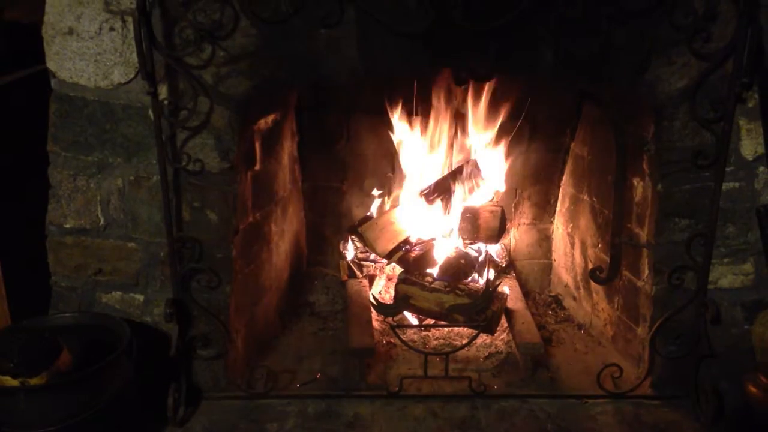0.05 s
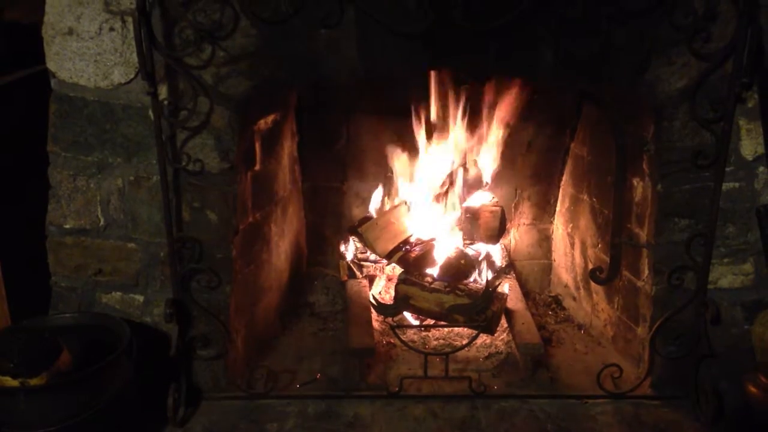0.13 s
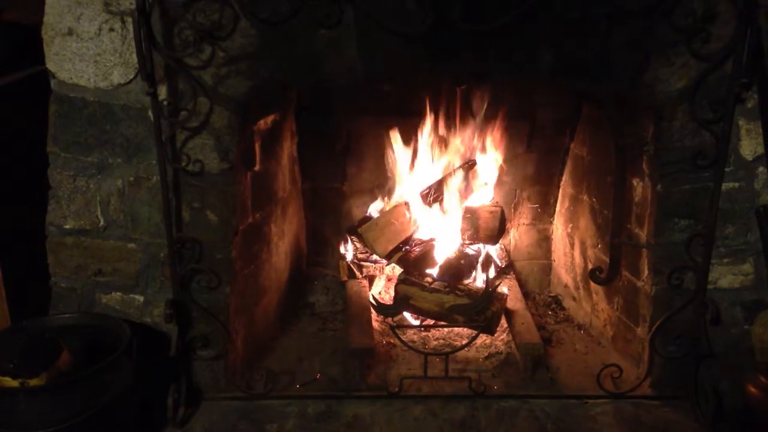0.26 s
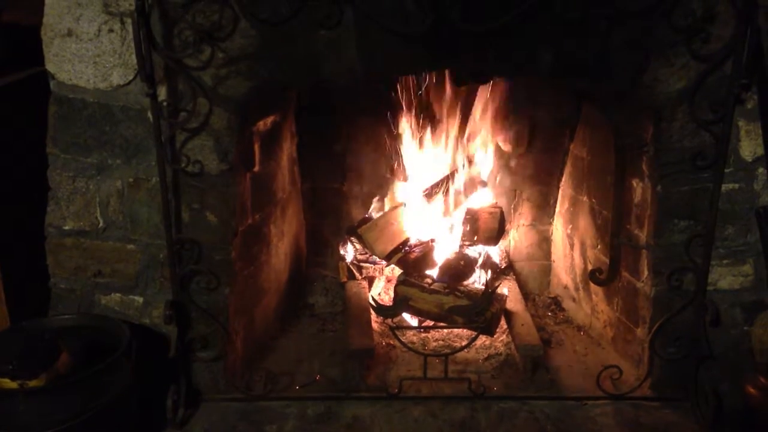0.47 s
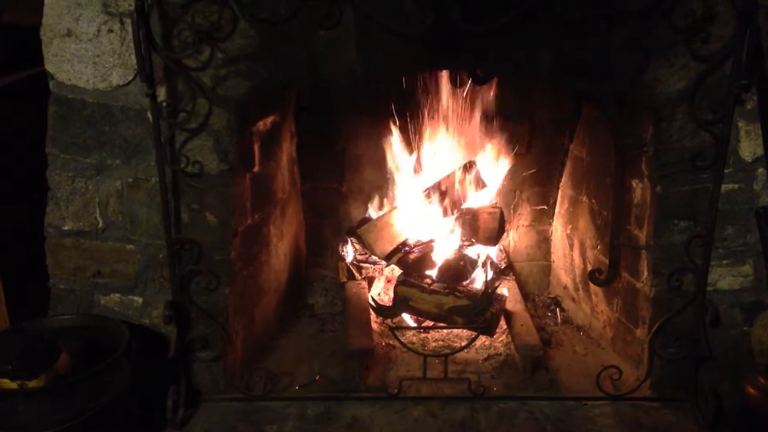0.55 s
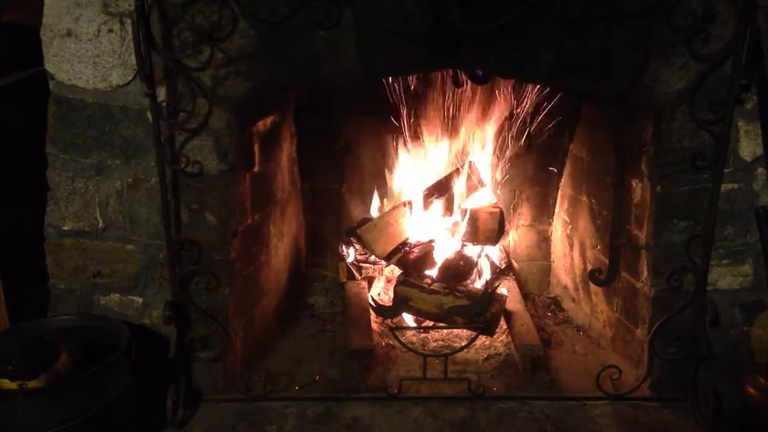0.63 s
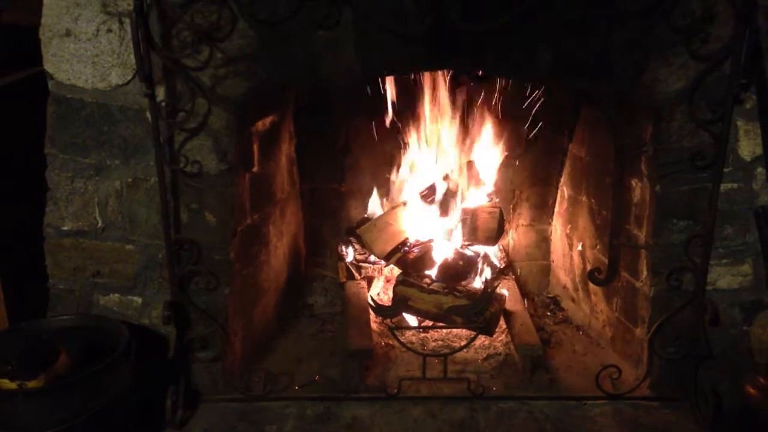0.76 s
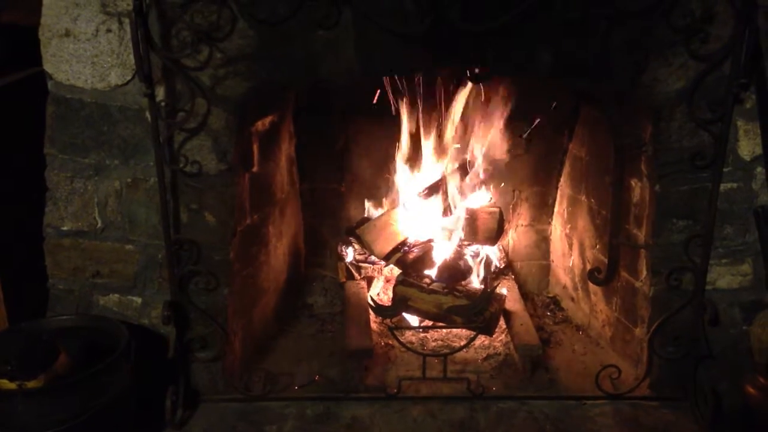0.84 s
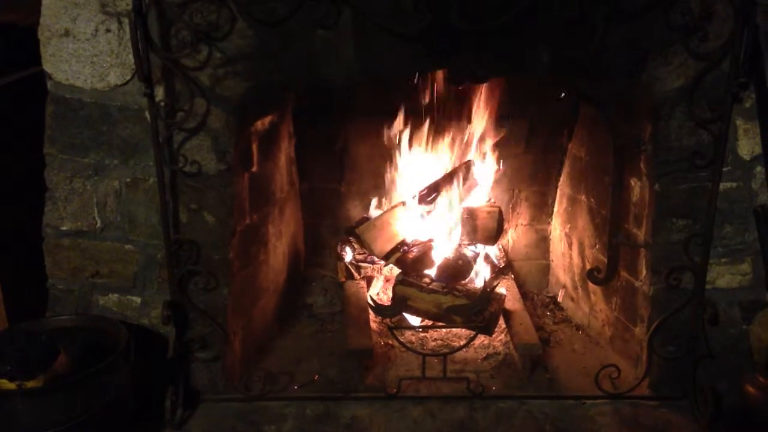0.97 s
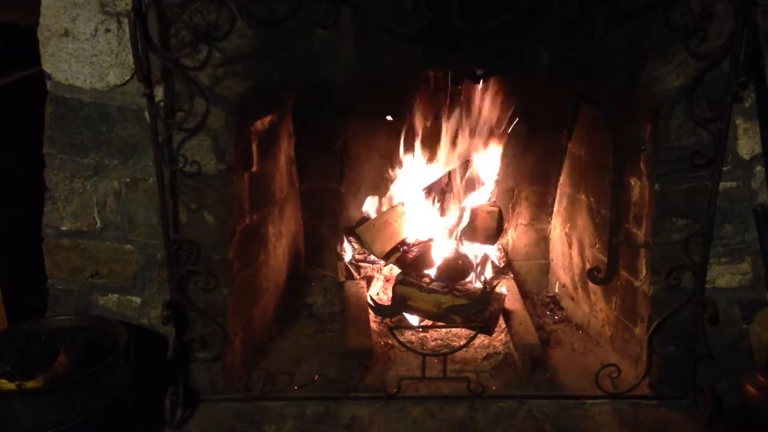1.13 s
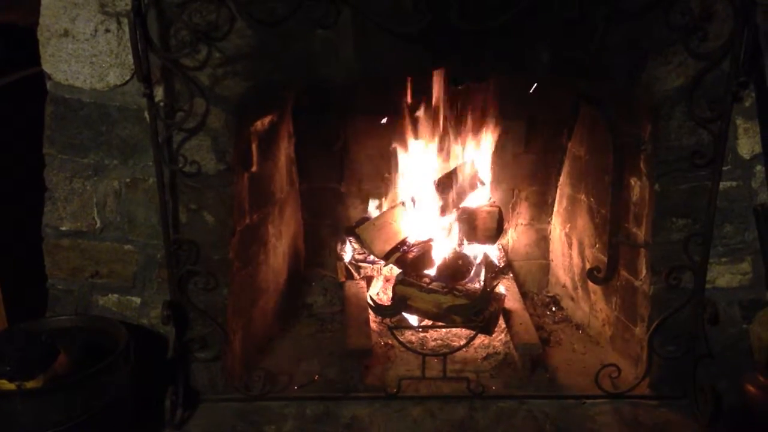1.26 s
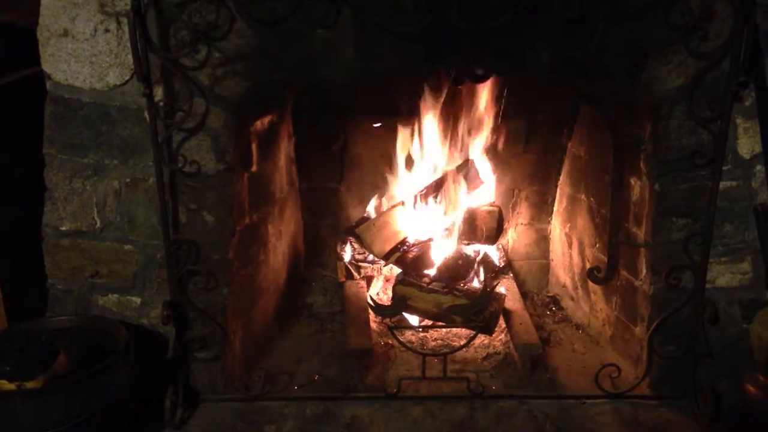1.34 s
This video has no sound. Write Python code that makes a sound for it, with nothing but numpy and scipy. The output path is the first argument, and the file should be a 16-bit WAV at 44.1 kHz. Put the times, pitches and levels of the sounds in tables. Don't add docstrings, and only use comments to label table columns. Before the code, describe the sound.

Wood fire snapping loudly a few times in a hearth, with tiny ticks and very faint low rumble

```python
import sys
import numpy as np
from scipy import signal
from scipy.fft import rfft, irfft, next_fast_len
from scipy.io import wavfile
from scipy.ndimage import uniform_filter1d, map_coordinates

SR = 44100
rng = np.random.default_rng(int(sys.argv[2]) if len(sys.argv) > 2 else 0)


def ratio_of_db(decibels):
    return 10 ** (np.asarray(decibels, float) / 20)


def to_wav(s):
    ch = np.atleast_2d(s).T
    pcm = np.round(np.clip(ch, -1, 1) * 32767)
    wavfile.write(sys.argv[1], SR, pcm.astype(np.int16))


N = 61739

# (time [s], level [dB])
FLAME_STRENGTH = [(0, -0.5), (.06, 1.5), (.16, 3.5), (.3, 1.5), (.4, -3), (.5, -1), (.62, 6), (.7, -3),
                  (.85, -4), (1.1, -1), (1.4, 1)]
# (frequency [Hz], level [dB])
FLAME_TONE = [(15, -45), (30, -19.5), (55, -7.5), (115, 0.5), (190, -3), (300, -15.5), (500, -26.5),
              (900, -39.5)]
# (frequency [Hz], level [dB])
HISS_TONE = [(300, -22.5), (600, -6), (1000, -14.5), (2000, -14.5), (5000, -13), (10000, -15), (15000, -18)]
# (time [s], hiss level [dB])
HISS_GAIN = [(0, 0.5), (.3, 0), (.45, -2.5), (1.199, -3), (1.4, -3)]
# (frequency [Hz], level [dB])
BAND_LIMIT = [(15300, 0), (15500, -24), (16500, -30), (16700, -90)]
# (time [s], peak level [dB], ring [Hz], room level [dB])
SPARKS = [
    (.167, -51, 5500, -5),
    (.1705, -50, 5500, -18),
    (.180, -48.5, 10900, -19),
    (.1915, -45.5, 10500, -21),
    (0.536, -48, 5000, 4.5),
    (.545, -54.5, 9110, -16),
    (0.66, -30, 11300, -30.5),
    (0.8321, -39, 12500, -13),
    (.872, -45, 12250, -17),
    (.853, -56, 4000, -8),
]
# (time [s], peak level [dB], burst [ms], tilt [dB per octave], low body [dB])
POPS = [
    (0.203, -4, 0.55, -1, -3.5),
    (0.2661, -27.5, 0.21, -3.5, 9),
    (0.3589, -6, 1.37, 0, 8),
    (0.5574, -2, 2.4, 0, 7),
    (0.7994, -32.5, .6, -3, -8),
    (0.9578, -21, 0.61, -3.5, 10.5),
    (1.2529, -37.5, 1.1, -2.5, -9.5),
]
# (room [dB], firebox [dB], thump [dB], wall echo [dB])
POP_ANSWERS = [(-17, -6.5, -39, -35), (-14.5, 2.5, -35, -15), (-12.5, -4, -45, -8.5), (-14, -9.5, -23.5, 1),
               (-14.5, -2, -19.5, -5.5), (-12.5, -2.5, -13.5, -9), (-12.5, -2.5, -40, -8)]
# (low ring [Hz], level [dB], high ring [Hz], level [dB])
POCKET_RINGS = [(2000, 4.5, 11000, 13), (3100, 1.5, 9000, 5.5), (2300, 5, 8000, 3), (1323, 8.5, 4400, 8.5),
                (2040, 5.5, 3900, 6.5), (2380, 5.5, 6300, 7.5), (1786, 6.5, 3500, 6.5)]
# (frequency [Hz], level [dB])
WOOD_TONE = [(200, -27.5), (500, -25), (1100, -17.5), (1400, -6.5), (2600, -5), (4600, -2), (9000, -5),
             (14500, -14)]
# (frequency [Hz], level [dB])
HEARTH_GAPS = [(2720, -3.5), (4850, -2.5)]
# (frequency [Hz], time [s])
FIREBOX_DECAY = [(500, 0.051), (3000, 0.061), (10000, 0.041), (15000, 0.044)]
# (frequency [Hz], time [s])
ROOM_DECAY = [(300, 0.27), (1000, 0.26), (1500, .32), (2500, 0.31), (5000, 0.31), (10000, 0.26),
              (15000, 0.21)]
# (frequency [Hz], level [dB])
ROOM_TONE = [(300, 8), (1000, 6), (1500, -5), (2500, -0.5), (5000, -1), (10000, -3.5), (15000, -3.5)]

FLAME_DB, HISS_DB = -61.5, -71
RING_WIDTH, GAP_WIDTH = 0.38, 0.16
RING_HEARD_FAR = 0.55
BODY_HZ = 800
WALL_S = 0.0043
FILL_S = 0.02
THUMP_HZ, THUMP_T60 = 158, 0.024


def unit(x):
    return x / np.sqrt(np.mean(x ** 2) + 1e-20)


def along(points, hz):
    f, v = np.transpose(points)
    return np.interp(np.log(hz + 1), np.log(f + 1), v)


def noise(tone):
    m = next_fast_len(N + 8192)
    spectrum = rfft(rng.standard_normal(m))
    spectrum = spectrum * ratio_of_db(along(tone, np.fft.rfftfreq(m, 1 / SR)))
    return unit(irfft(spectrum, m)[:N])


def flames():
    t = np.arange(N) / SR
    flutter = map_coordinates(rng.standard_normal(50), [t * 25])
    rumble = unit(ratio_of_db(3.9 * np.tanh(flutter)) * noise(FLAME_TONE))
    return ratio_of_db(FLAME_DB + np.interp(t, *np.transpose(FLAME_STRENGTH))) * rumble


def add(out, s, x):
    part = out[round(s * SR):][:len(x)]
    part += x[:len(part)]


def causal(x, gain_db):
    m = 2 * next_fast_len(len(x))
    c = irfft(np.log(ratio_of_db(gain_db(np.fft.rfftfreq(m, 1 / SR))) + 1e-4), m)
    c[1:m // 2] *= 2
    c[m // 2 + 1:] = 0
    return irfft(rfft(x, m) * np.exp(rfft(c)), m)[:len(x)]


def tail(t60s, fill_s):
    hz, t, z = signal.stft(rng.standard_normal(SR // 2), SR, nperseg=128)
    decay = ratio_of_db(-60 * t / along(t60s, hz)[:, None])
    h = signal.istft(z * decay, SR, nperseg=128)[1][:SR // 2]
    h = h * (1 - np.exp(-(np.arange(len(h)) / SR / fill_s) ** 2))
    return h / np.linalg.norm(h)


def octaves(f, centre):
    return np.log2((f + 1) / centre)


def bumps(f, peaks, width):
    return sum(db * np.exp(-(octaves(f, hz) / width) ** 2) for hz, db in peaks)


def colour(tilt_db, body_db, rings, share):
    def gain_db(f):
        wood = along(WOOD_TONE, f) + tilt_db * np.maximum(octaves(f, 4000), -2)
        body = body_db / (1 + (f / BODY_HZ) ** 4)
        return wood + body + share * (bumps(f, rings, RING_WIDTH) + bumps(f, HEARTH_GAPS, GAP_WIDTH))
    return gain_db


def snap(db, burst_ms, tilt_db, body_db, rings, room_db, box_db, wall_db):
    ms = np.arange(1024) / SR * 1000
    fade = 0.5 * np.exp(-np.abs(ms - burst_ms) / 0.45)
    splinters = 0.58 * rng.standard_normal(len(ms)) * np.where(ms < burst_ms, 1, fade)
    splinters[:2] = 2.2, -1.0
    own_db = 10 * np.log10(uniform_filter1d(np.abs(rfft(splinters)) ** 2, size=15))
    own_db = own_db - own_db.mean()
    own_hz = np.fft.rfftfreq(len(ms), 1 / SR)
    near = colour(tilt_db, body_db, rings, 1)
    far = colour(tilt_db, body_db, rings, RING_HEARD_FAR)
    crack = causal(splinters, lambda f: near(f) - np.interp(f, own_hz, own_db))
    crack = ratio_of_db(db) * crack / np.abs(crack).max()
    box = ratio_of_db(box_db) * unit(causal(tail(FIREBOX_DECAY, 0.00087), near))
    room = ratio_of_db(room_db) * unit(causal(tail(ROOM_DECAY, FILL_S), lambda f: far(f) + along(ROOM_TONE, f)))
    y = (box + room) * np.linalg.norm(crack) / np.sqrt(len(box))
    add(y, 0, crack)
    add(y, WALL_S, -ratio_of_db(wall_db) * crack[:66] * np.hanning(132)[66:])
    return y


def sparks():
    out = np.zeros(N)
    for s, db, hz, room_db in SPARKS:
        tilt_db = 2.5 * np.log2(hz / 4000)
        add(out, s, snap(db, 0.35, tilt_db, -5.5, [(hz, 8.0)], room_db, -2.0, -7.5))
    return out


def thud(db, hz, t60):
    t = np.arange(SR // 8) / SR
    return ratio_of_db(db - 60 * t / t60) * np.sin(2 * np.pi * hz * t) * (1 - np.exp(-t / 0.00069))


def pops():
    out = np.zeros(N)
    for pop, rings, answers in zip(POPS, POCKET_RINGS, POP_ANSWERS):
        s, db, burst_ms, tilt_db, body_db = pop
        room_db, box_db, thump_db, wall_db = answers
        rings = np.reshape(rings, (2, 2))
        add(out, s, snap(db, burst_ms, tilt_db, body_db, rings, room_db, box_db, wall_db))
        add(out, s, thud(db + thump_db, THUMP_HZ, THUMP_T60))
    return out


def settling_log():
    out = np.zeros(N)
    add(out, 0.2735, thud(db=-36, hz=185, t60=0.04))
    return out


def scene():
    return (pops() + sparks() + settling_log() + flames())[None]


def low_pass(x):
    return signal.sosfilt(signal.butter(12, 16570, fs=SR, output="sos"), x)


def record(dry):
    top, hardness = 0.93, 3.5
    x = dry[0] / (1 + np.abs(dry[0] / top) ** hardness) ** (1 / hardness)
    hiss_db = HISS_DB + np.interp(np.arange(N) / SR, *np.transpose(HISS_GAIN))
    x = x + ratio_of_db(hiss_db) * noise(HISS_TONE)
    m = next_fast_len(N + 8192)
    f = np.fft.rfftfreq(m, 1 / SR)
    ring_hz, width_hz, ring_db = 3030, 70, -8
    ahead = -1j * f * width_hz / (ring_hz ** 2 - f * f - 1j * f * width_hz)
    response = (1 + ratio_of_db(ring_db) * ahead) * ratio_of_db(along(BAND_LIMIT, f))
    mix = irfft(rfft(x, m) * response, m)[:N]
    return low_pass(mix[None])


dry = scene()
out = record(dry)
to_wav(out)
```